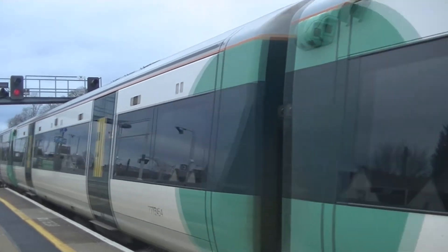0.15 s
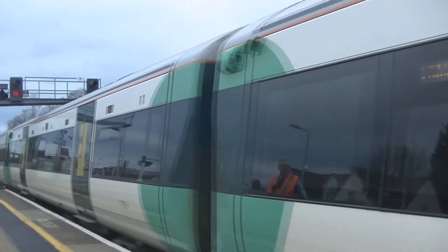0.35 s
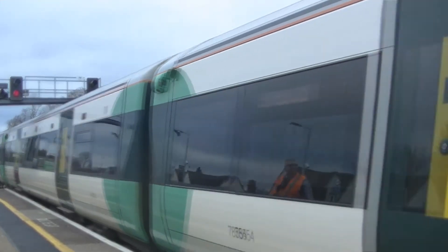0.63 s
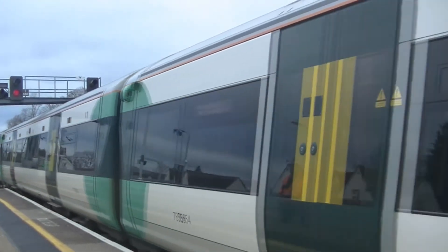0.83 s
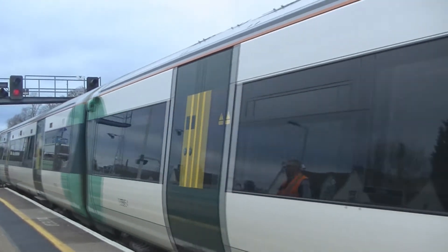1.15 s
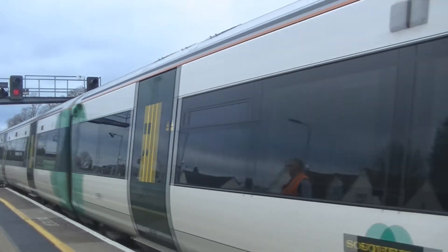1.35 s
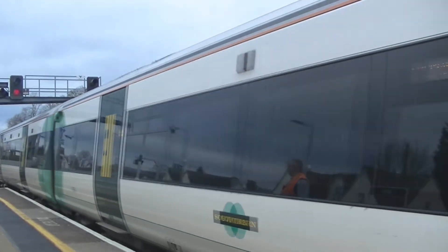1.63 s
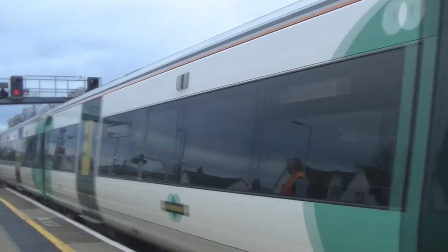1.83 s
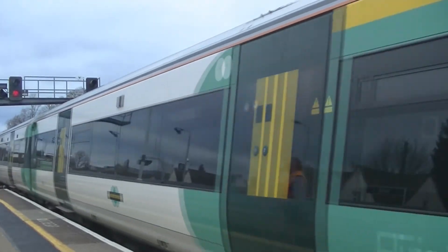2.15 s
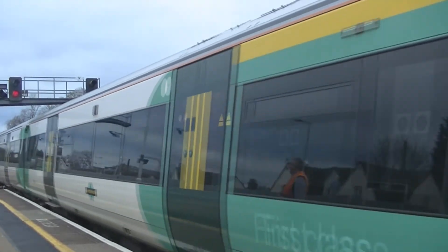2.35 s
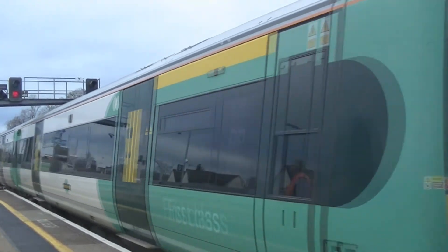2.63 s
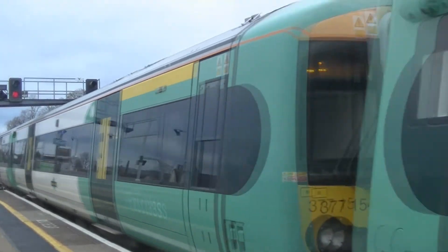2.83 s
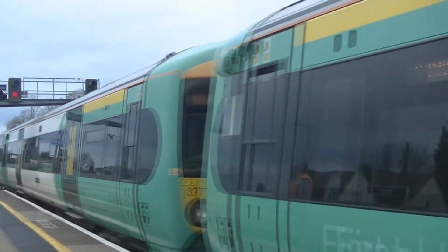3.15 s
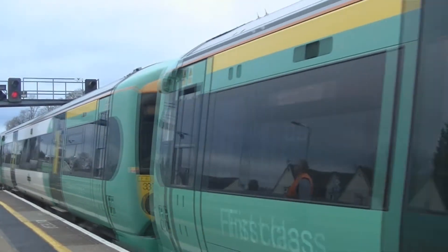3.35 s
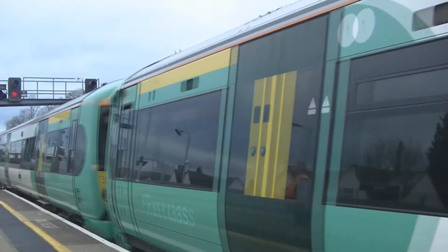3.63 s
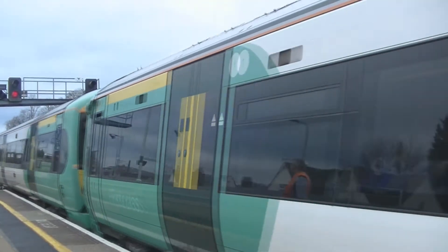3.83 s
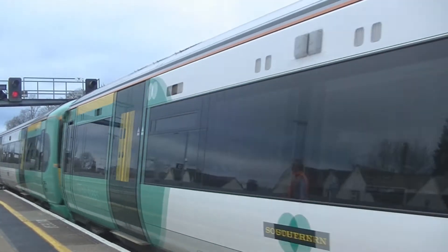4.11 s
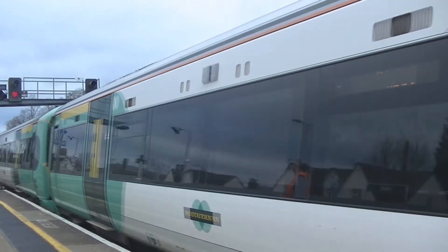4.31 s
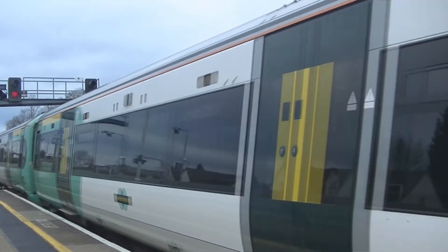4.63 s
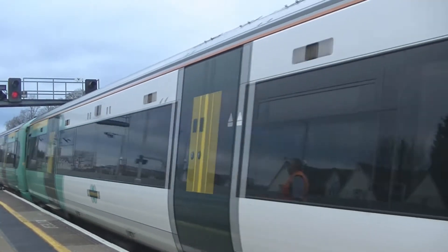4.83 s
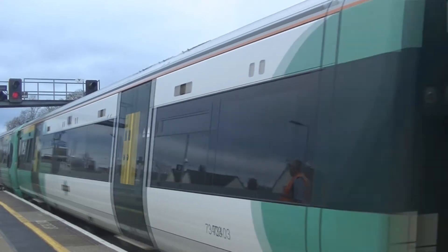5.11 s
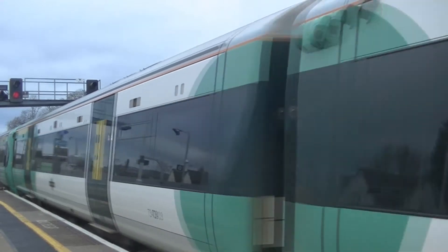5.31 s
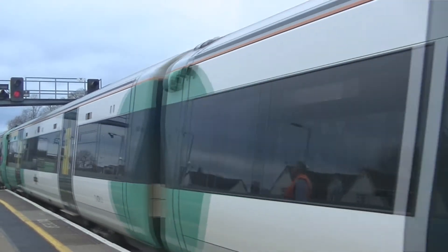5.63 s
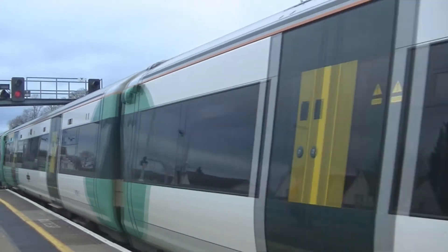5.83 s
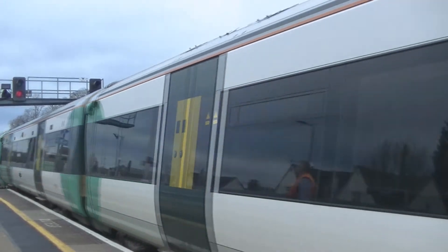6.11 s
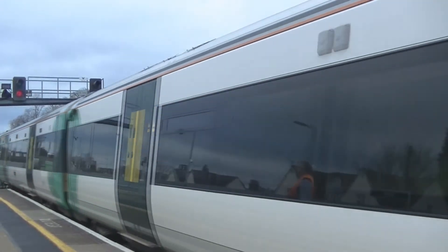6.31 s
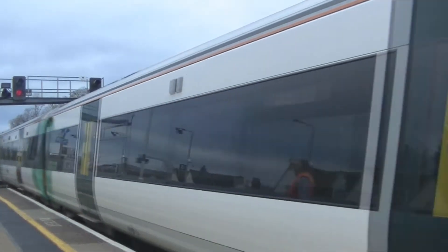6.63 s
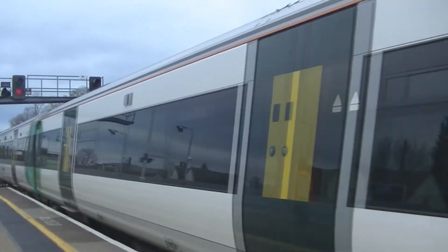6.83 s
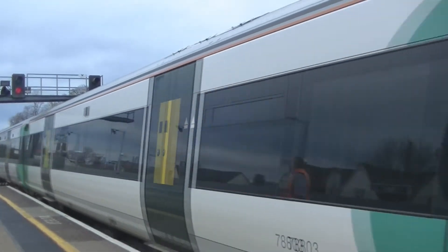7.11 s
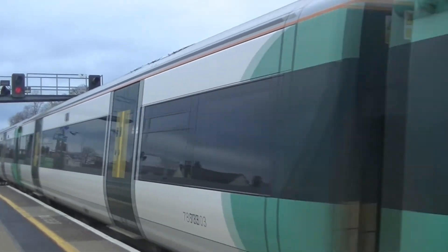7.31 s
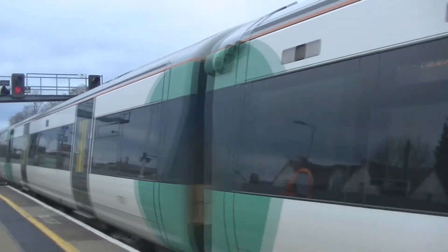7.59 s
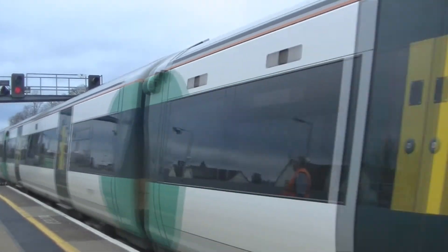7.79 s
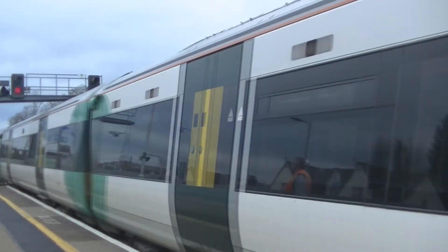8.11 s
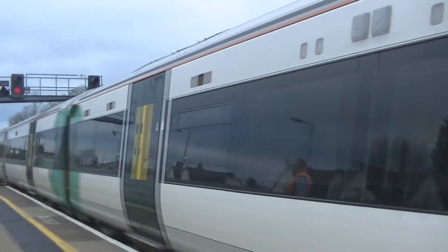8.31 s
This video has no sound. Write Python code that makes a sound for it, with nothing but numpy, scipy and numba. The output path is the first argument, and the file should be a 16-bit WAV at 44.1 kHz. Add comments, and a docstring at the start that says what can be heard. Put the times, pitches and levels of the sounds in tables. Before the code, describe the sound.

Close to a platform edge, a stereo microphone hears an electric train rolling past with a continuous, surging roar of wheels. High electric whistles and faint fan tones dip slightly in pitch as the coaches go by. Then a wavering, gently rising gear whine and a rich hum take over as the train speeds up, easing near the end. Occasional soft knocks over rail joints and brief air puffs dot the passage.

```python
"""An electric train gathers speed along a platform, its gears whining as each bogie (wheel set) passes. The
inverters that power the motors hum and whistle, and the whistles drop in pitch as they go by. Under them the
wheels roar on the rails and knock over joints, roof fans sing, and air hisses briefly at the gaps between
coaches. A stereo microphone about two metres away hears it all. A very faint deep rumble swells when the train
is loudest."""
import sys
import numpy as np
from scipy import signal
from scipy.fft import rfft, irfft, next_fast_len
from scipy.io import wavfile
from numba import njit

SR = 44100
rng = np.random.default_rng(int(sys.argv[2]) if len(sys.argv) > 2 else 0)


def unload_wav(signal):
    """Save mono or channel-first audio to the path in sys.argv[1] as 16-bit WAV at rate SR, clipped to [-1, 1]."""
    wavfile.write(
        sys.argv[1],
        SR,
        np.round(np.clip(np.atleast_2d(signal).T, -1, 1) * 32767).astype(np.int16),
    )


N = 373086
STEP = 64  # samples from one update of pitch and level to the next
TICKS = np.arange(N // STEP + 2) * STEP / SR  # the times of those updates, in seconds
TIME = np.arange(N) / SR

# Pitch of the loudest gears: t/s, f/Hz
WHINE_PITCH = [(2.8, 612), (3.3, 636), (4, 655.5), (4.6, 662.5), (5.05, 660), (5.5, 667), (5.8, 674),
               (6.1, 682), (6.45, 686), (6.75, 676), (7.05, 683), (7.5, 685), (8, 696), (8.46, 707.5)]
# How loud they are: t/s, level/dB
WHINE_LEVEL = [(2.8, -48.5), (3.05, -45), (3.35, -38), (3.72, -42.5), (3.79, -38), (3.98, -30), (4.07, -33),
               (4.13, -24.5), (4.17, -31), (4.28, -35.5), (4.45, -26), (4.6, -23.5), (5, -24), (5.4, -21.5),
               (5.62, -19), (5.85, -22.5), (6.15, -25.5), (6.45, -20.5), (6.75, -16), (7.1, -16),
               (7.35, -20), (7.75, -20.5), (8.05, -29.5), (8.46, -32)]
# Brief dips where echoes and axles cancel each other: t/s, depth/dB
WHINE_DIPS = [(3.92, 20), (4.33, 16), (4.385, 12.5), (4.52, 20), (4.688, 8), (4.719, 7.5), (4.823, 7),
              (4.859, 13), (4.914, 9), (5.017, 10), (5.092, 4), (5.238, 7.5), (5.293, 12), (5.527, 12.5),
              (5.562, 19.5), (5.667, 2.5), (5.735, 15), (5.844, 5), (5.994, 10), (6.074, 19), (6.128, 5),
              (6.199, 9), (6.245, 8.5), (6.289, 7.5), (6.393, 14), (6.487, 12), (6.519, 21), (6.603, 6.5),
              (6.628, 7.5), (6.718, 13), (6.807, 14), (6.952, 7.5), (7.067, 8.5), (7.164, 3), (7.28, 5.5),
              (7.304, 16), (7.347, 19), (7.434, 7), (7.548, 12), (7.612, 13), (7.703, 1), (7.949, 5),
              (8.008, 5), (8.053, 9), (8.128, 7), (8.362, 15)]
# The close tones that make up the whine: pitch multiple, relative level/dB, width/Hz, steady share
WHINE_TONES = [(.965, -15.5, 13.5, 0.11), (1, 0, 5, 0.9), (1.01, -14, 18, .05), (1.04, -13.5, 15, 0.055)]
def gear_whine(out):
    """Gear teeth meet and whine; nearby axles turn at slightly different speeds and smear the pitch."""
    dip_s, slip_cycles_per_db = 0.014, 0.2  # dip_s is half the length of a dip
    when, depth_db = np.transpose(WHINE_DIPS)
    dips = np.exp(-((TICKS - when[:, None]) / dip_s) ** 2)
    # in each dip the wave slips forward or back by up to half a cycle
    slips = np.clip(slip_cycles_per_db * depth_db, 0, .5) * rng.choice([-1, 1], len(when))
    hz = curve(WHINE_PITCH) + slips @ dips / (dip_s * np.sqrt(np.pi))
    db = curve(WHINE_LEVEL, left=-99) - depth_db @ dips
    for multiple, tone_db, width, steady in WHINE_TONES:
        tone(out, multiple * hz, db + tone_db, width, steady)


# Gears of the other bogies, one list for each whine: t/s, f/Hz, level/dB
FAINT_WHINES = [
    [(0, 457.6, -42.5), (.2, 473.5, -46), (.5, 484, -39), (.9, 497.5, -40), (1.15, 504.7, -49),
     (1.5, 508.5, -51), (2, 518.5, -47), (2.5, 552, -50), (2.8, 582, -48.5)],
    [(1.05, 747, -56.5), (1.2, 748, -43.5), (1.55, 762, -57)],
    [(3.4, 694, -54.5), (3.8, 701.4, -37.5), (4.5, 721, -41), (5.3, 715, -43)],
    [(5.6, 712, -50.5), (6.1, 720, -42), (6.45, 740, -39.5), (6.9, 755, -46)],
    [(5.8, 645, -45.5), (6.2, 653, -25.5), (6.6, 655, -50), (7.15, 649, -34.5), (7.5, 653, -37),
     (7.8, 660, -46)],
    [(7.0, 723, -46.5), (7.6, 725.4, -37), (8.1, 746.5, -38), (8.46, 755, -33.5)],
    [(4.05, 320, -49), (4.12, 323, -34.5), (4.95, 331, -38.5), (5.05, 332, -42.5), (5.7, 338, -45.5)],
    [(6.1, 338.4, -48.5), (6.4, 339, -36), (6.7, 332.2, -45), (7.3, 329.3, -42.5), (7.6, 330, -55)],
]
def faint_gears(out):
    """Other gears whine more softly; late on, at higher speed, their tones smear together."""
    for table in FAINT_WHINES:
        start_s = table[0][0]
        width_hz, steady = (16, 0.2) if start_s > 5.5 else (7, 0.75)
        tone(out, *track(table), width_hz, steady)


# Base note of the hum, one list for each of two bogies: t/s, f/Hz, level/dB
HUM_NOTES = [
    [(4.2, 655, -57.5), (4.62, 666.3, -36.5), (5.0, 660, -35.5), (5.4, 661, -39.5), (5.8, 674, -55),
     (6.1, 661, -42)],
    [(5.8, 684, -53), (6.3, 685, -43), (6.55, 683.4, -39.5), (6.9, 677, -34), (7.47, 668, -39),
     (7.56, 668.7, -54.5)],
]
# Its overtones: pitch multiple, first bogie's level/dB, second bogie's level/dB, base width/Hz
HUM_OVERTONES = [(2, -4, -24, 2.6), (3.5, -13.5, -15, 11), (4, -4, -5.5, 21.7), (4.2, -18.5, -5.5, 50),
                 (4.5, -6.5, -5, 50), (5, 0, -4.5, 20), (6, -2.5, -3.5, 51), (7, -9.5, -8.5, 57),
                 (8, -3.5, -12, 60), (9, -10.5, -6.5, 100), (10, -14.5, -14.5, 58), (11, -22, -22, 120),
                 (12, -30, -18, 120), (13, -22.5, -19.5, 120), (14, -27, -29, 120), (15, -34, -24, 220)]
# What those widths are multiplied by: first bogie, second bogie
HUM_WIDENING = (0.93, 1.9)
def inverter_hum(out):
    """Each inverter hums a stack of overtones whose pitch is tied to the speed of its motor."""
    for bogie, table in enumerate(HUM_NOTES):
        hz, db = track(table)
        for multiple, *overtone_db, width in HUM_OVERTONES:
            tone(out, multiple * hz, db + overtone_db[bogie], width * HUM_WIDENING[bogie], steady=0.073)


# One whistle for each motor: passing t/s, closest distance/m, f/Hz, relative level/dB, width/Hz
WHISTLES = [(0, 4., 1985, 3, 3.7), (0.1, 2.5, 2006, 6, 11.6), (0.449, 2.518, 2001, 1, 6.1),
            (4.501, 3., 2004, 4.5, 14.6), (3.499, 2.7, 1996, -5, 13), (6.998, 3., 1985, 2, 13.6),
            (7.5, 2.5, 2000, 0, 22)]
# All these whistles together: t/s, level/dB
WHISTLE_LEVEL = [(0, -27), (.12, -31), (.44, -29), (.52, -40.5), (.76, -26.5), (.85, -39.5), (.9, -27),
                 (.98, -35.5), (1.36, -32.5), (1.47, -38), (1.9, -39), (3.4, -43), (4.85, -34), (5.25, -40),
                 (5.6, -36.5), (6, -42), (6.9, -32.5), (7.5, -35.5), (8, -49), (8.46, -45.5)]
# Further tones of the first inverter: f/Hz, level when closest/dB, width/Hz
SWITCHING_TONES = [(1500, -52, 25), (2480, -54, 25), (2945, -38, 35), (3040, -39, 35), (3870, -45, 30),
                   (3985, -40, 28), (4500, -52, 50), (5020, -47, 120), (5990, -48, 90), (6950, -57, 120),
                   (8700, -55, 400), (9150, -57, 400), (9990, -56, 320)]
# Whistles of far bogies, blurred by platform echoes: f/Hz, relative level/dB, width/Hz
FAR_WHISTLES = [(2008, -3.5, 80), (2908, -10.5, 47), (3016, -11, 45), (3085, -12.5, 30), (3964, -14.5, 83)]
def inverter_whistles(out):
    """Inverters switch the current at a fixed rate; the near ones drop in pitch as they go by."""
    total_db = curve(WHISTLE_LEVEL)
    pitches, shares_db = [], []
    for when, closest_m, hz, db, _ in WHISTLES:
        shift, distance_db = passing(when, closest_m)
        pitches.append(hz * shift)
        shares_db.append(db + 0.74 * distance_db)
    # the shares add up to the total, and the nearest motors get the most
    shares_db = np.array(shares_db) - 10 * np.log10(np.sum(undb(shares_db) ** 2, axis=0))
    for (*_, width), hz, share_db in zip(WHISTLES, pitches, shares_db):
        tone(out, hz, total_db + share_db, width, steady=0.65)
    shift, distance_db = passing(when=.35, closest_m=4.)
    for hz, db, width in SWITCHING_TONES:
        tone(out, hz * shift, db + 3.3 * distance_db, width, steady=0.021)
    for hz, db, width in FAR_WHISTLES:
        tone(out, np.full_like(TICKS, hz), 0.26 * total_db - 28 + db, width, steady=0)


# The roar of the whole train, from low to high: f/Hz, relative level/dB
ROAR_SPECTRUM = [(110, -29), (280, -19.5), (520, -12.5), (760, -16), (1100, -15.5), (1500, -19.5),
                 (2300, -17.5), (3000, -19), (3900, -17.5), (4400, -21), (5000, -21.5), (5600, -25.5),
                 (6300, -26.5), (7700, -41), (8700, -37.5), (9700, -41.5), (11500, -49.5), (15500, -63)]
# What each bogie adds, relative to that roar: passing t/s, bass/dB, rumble/dB, rush/dB, sizzle/dB
PASSING_BOGIES = [(0, 15.5, 3.5, -5, 9), (.65, 0, -30, -13, 8), (1.851, 4, 6, -5, -9),
                  (2.65, 8, 0.5, -2.5, 0.5), (3.05, 12.5, 0, -4, 2), (4.65, 7, 5.5, 7, 13),
                  (5.1, 7.5, 8, 5, 9.5), (5.65, 13.5, -4, 6, 0), (6.8, -2, 7.5, 7.5, 11),
                  (7.3, 11.5, 11, 5, 8.5), (7.9, 14.5, -14, -14, 4), (8.3, -8, 5, 5.5, 5.5)]
# Where bass, rumble, rush and sizzle lie: f/Hz
BOGIE_BANDS = (170, 450, 2500, 8000)
def wheel_roar():
    """Wheels roar on the rails; each octave of the noise swells as bogies pass and flickers by itself."""
    bogie_m, roar_db = 1.71, -13.5
    beaming = 0.89  # scales the distance loss in dB as the wheels move off and turn away
    distance_db = np.array([passing(row[0], bogie_m)[1] for row in PASSING_BOGIES])
    nearness = undb(beaming * distance_db) ** 2
    size = next_fast_len(N)
    f = np.fft.rfftfreq(size, 1 / SR)
    noise = rfft(rng.standard_normal((2, size))) * undb(level_at(ROAR_SPECTRUM, f))
    octave = np.log2(np.maximum(f, 1))
    swell = wander(3.2, rows=1)[0]
    out = 0
    for centre in np.arange(6, 15):  # octaves from 64 Hz up
        share = np.cos(np.pi / 2 * np.clip(octave - centre, -1, 1)) ** 2
        band = irfft(noise * share, size)[:, :N]
        bogie_db = [level_at(list(zip(BOGIE_BANDS, row[1:])), 2. ** centre) for row in PASSING_BOGIES]
        flicker = wander(9.1, rows=1)[0]
        gain = np.sqrt(1 + undb(bogie_db) ** 2 @ nearness) * undb(0.86 * swell + 0.63 * flicker)
        out = out + band * np.interp(TIME, TICKS, gain)
    return out * undb(roar_db)


# Wheels crossing gaps in the rail: t/s, level/dB, f/Hz, fade time/s
JOINT_KNOCKS = [(2.128, -38.5, 323, 0.043), (2.739, -37.5, 421, 0.045), (3.067, -37, 413, 0.037),
                (5.151, -37, 477, 0.12), (6.736, -32.5, 522, 0.064), (7.4, -37.5, 519.5, 0.12)]
def rail_knocks(out):
    """A wheel hits a rail joint with a dull knock."""
    bursts(out, JOINT_KNOCKS, spread=1.25, rise=0.72)


# Short hisses of air, as at the gaps between coaches: t/s, level/dB, f/Hz, fade time/s
AIR_PUFFS = [(2.565, -54, 8500, .02), (2.568, -38, 4600, .015), (3.09, -45.5, 6200, .1),
             (2.877, -39, 4200, 0.018), (3.081, -53, 9600, 0.1), (3.702, -38, 4000, 0.022),
             (4.45, -33.5, 3070, 0.03), (5.394, -56, 10400, 0.075), (6.153, -32, 3470, 0.034),
             (8.321, -33.5, 3000, 0.05)]
def air_puffs(out):
    """Air rushing past a gap between coaches makes a short, high hiss."""
    bursts(out, AIR_PUFFS, spread=1.17, rise=0.79)


# Fans on the roof: passing t/s, closest distance/m, f/Hz, level when closest/dB, width/Hz
ROOF_FANS = [(1.501, 2.396, 1695, -42.5, 17), (3.3, 2.6, 1774, -43.5, 40)]
def roof_fans(out):
    """Spinning blades make a tone that swells and drops in pitch as the coach goes by."""
    for when, closest_m, hz, db, width in ROOF_FANS:
        shift, distance_db = passing(when, closest_m)
        tone(out, hz * shift, db + 1.23 * distance_db, width, steady=0.75)


# How fast the train goes: t/s, speed/(m/s)
TRAIN_SPEED = [(0, 6.2), (8.46, 7.8)]
def passing(when, closest_m):
    """Pitch factor (Doppler effect) and level in dB, 0 when closest, of a passing point on the train."""
    speed = curve(TRAIN_SPEED)
    travelled = np.cumsum(speed) * STEP / SR
    along = travelled - np.interp(when, TICKS, travelled)
    distance = np.hypot(along, closest_m)
    return 1 - speed * along / distance / 343, 20 * np.log10(closest_m / distance)


def tone(out, hz, db, width_hz, steady):
    """Adds a wavering tone and its echo; width_hz sets how fast it wavers, steady how much holds still."""
    parts = wander(width_hz, rows=4) * np.sqrt(1 - steady)
    parts[[0, 3]] += np.sqrt(2 * steady)  # the echo's steady part is a quarter cycle late
    audible = np.flatnonzero(db > -90)
    first, end = audible[0], audible[-1] + 1
    parts = (parts * undb(db))[:, first:end]
    oscillate(out[:, first * STEP:(end - 1) * STEP], hz[first:end], parts[:2].copy(), parts[2:].copy())


@njit
def oscillate(out, hz, cos_gain, sin_gain):
    """Adds a wave to both rows, gliding its pitch and strength from tick to tick."""
    phase = 0.
    for i in range(out.shape[1]):
        k, u = i // STEP, (i % STEP) / STEP
        phase += 2 * np.pi * (hz[k] + u * (hz[k + 1] - hz[k])) / SR
        for row in range(2):
            a = cos_gain[row, k] + u * (cos_gain[row, k + 1] - cos_gain[row, k])
            b = sin_gain[row, k] + u * (sin_gain[row, k + 1] - sin_gain[row, k])
            out[row, i] += a * np.cos(phase) + b * np.sin(phase)


def bursts(out, table, spread, rise):
    """Adds short swells of noise from f / spread to f * spread; rise is swell time over fade time."""
    for when, db, hz, fade_s in table:
        i = np.arange(int((when - 2 * fade_s) * SR), min(int((when + 3 * fade_s) * SR), N))
        band = signal.butter(2, [hz / spread, hz * spread], "bandpass", fs=SR, output="sos")
        noise = signal.sosfilt(band, rng.standard_normal((2, SR))[:, :len(i)])
        age = (i / SR - when) / fade_s
        shape = np.exp(-np.where(age < 0, age / rise, age) ** 2)
        out[:, i] += noise / noise.std() * undb(db) * shape


def wander(width_hz, rows):
    """Smooth random curves, one value a tick, with a typical size of 1."""
    pole = np.exp(-2 * np.pi * width_hz * STEP / SR)
    x = signal.lfilter([1], [1, -2 * pole, pole * pole], rng.standard_normal((rows, len(TICKS))))
    return x / x.std(axis=1, keepdims=True)


def track(table):
    """Pitch and level from rows of t/s, f/Hz, level/dB, fading out beyond the ends."""
    t, hz, db = np.transpose(table)
    beyond_s = np.maximum(np.maximum(t[0] - TICKS, TICKS - t[-1]), 0)
    return np.interp(TICKS, t, hz), np.interp(TICKS, t, db) - 150 * beyond_s


def curve(points, x=TICKS, left=None):
    """Joins points with straight lines."""
    return np.interp(x, *np.transpose(points), left=left)


def level_at(points, hz):
    """Reads rows of f/Hz, level/dB with every octave equally wide."""
    f, db = np.transpose(points)
    return np.interp(np.log(np.maximum(hz, 1)), np.log(f), db)


def undb(db):
    return 10 ** (np.asarray(db) / 20)


# Strength of the echoes next to the direct sound: f/Hz, level/dB
ECHO_SPECTRUM = [(120, -50), (380, -15), (700, -17.5), (1290, -10.5), (2380, -12.5), (3100, -10.5),
                 (4400, -21), (8120, -31), (15000, -36)]
# Sway of the band that leans right: t/s, push to the left (relative)
SWAY = [(0.0, -0.5), (0.942, 0.5), (2.21, 1), (3.6, 0), (4.17, -1), (5.58, 2), (6.599, -0.5), (7.92, 2),
        (8.46, 2)]
# How far the left channel's wave runs ahead: f/Hz, phase/rad
LEFT_LEAD = [(0, 0.0083), (1380, -0.13), (3100, 0.26), (6370, -0.4), (8100, -0.25), (15200, 0.34)]
def stereo(direct, echoes):
    """Direct sound sits in the middle; echoes off the platform and coaches give the width."""
    size = next_fast_len(N + SR)
    f = np.fft.rfftfreq(size, 1 / SR)
    spectrum = rfft(direct, size)
    width = irfft(rfft(echoes, size) * undb(level_at(ECHO_SPECTRUM, f)), size)[:N]
    # the microphone's two halves point apart, so one band leans right and the phases differ a little
    lean_hz, lean_width_hz = 1840, 1080
    lean = 0.21 - 0.094 * curve(SWAY, TIME)
    band = irfft(spectrum * np.exp(-((f - lean_hz) / lean_width_hz) ** 2), size)[:N]
    lead = irfft(spectrum * .5j * curve(LEFT_LEAD, f), size)[:N]
    side = width - lean * band + lead
    return np.array([direct + side, direct - side])


def scene():
    """Adds every source into two rows, direct sound and echoes, then spreads them left and right."""
    out = wheel_roar()
    for source in (rail_knocks, air_puffs, gear_whine, faint_gears,
                   inverter_hum, inverter_whistles, roof_fans):
        source(out)
    return stereo(*out)


# A very faint deep rumble that swells when the train is loudest: t/s, level/dB
LOW_RUMBLE_LEVEL = [(0, -80), (.6, -86), (4, -86), (4.7, -80), (6, -83), (6.8, -79), (8.46, -84)]
def record(dry):
    """A filter cuts the bass, a faint deep rumble is added, and the recorder cuts the highest treble."""
    low_cut_hz, top_hz, rumble_hz = 229.4, 15450, 90
    train = signal.sosfilt(signal.butter(4, low_cut_hz, "highpass", fs=SR, output="sos"), dry)
    noise = rng.standard_normal(dry.shape)
    rumble = signal.sosfilt(signal.butter(2, rumble_hz, fs=SR, output="sos"), noise)
    rumble = rumble / rumble.std() * undb(curve(LOW_RUMBLE_LEVEL, TIME))
    return signal.sosfilt(signal.ellip(10, .2, 80, top_hz, fs=SR, output="sos"), train + rumble)


dry = scene()
out = record(dry)
unload_wav(out)
```